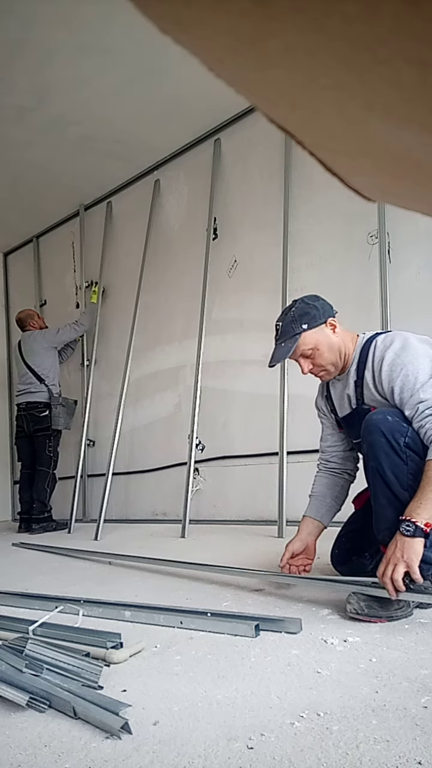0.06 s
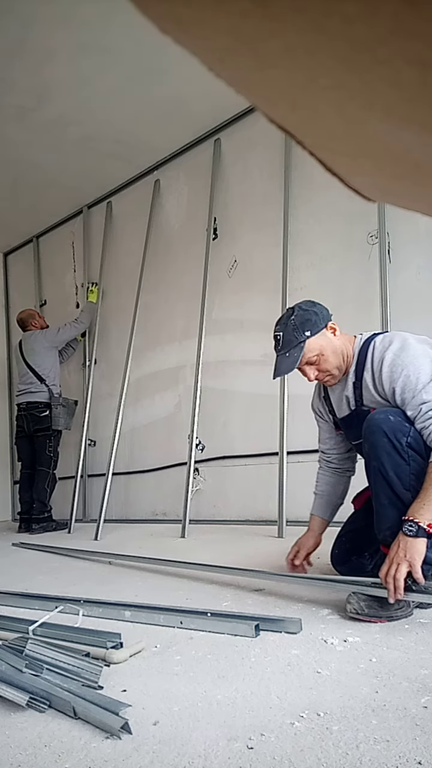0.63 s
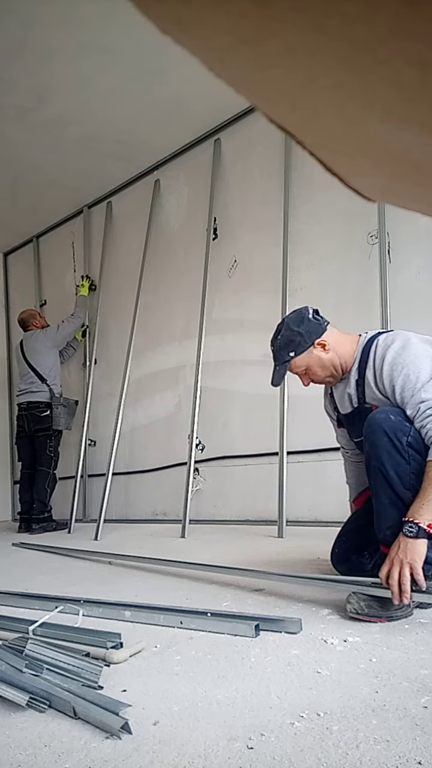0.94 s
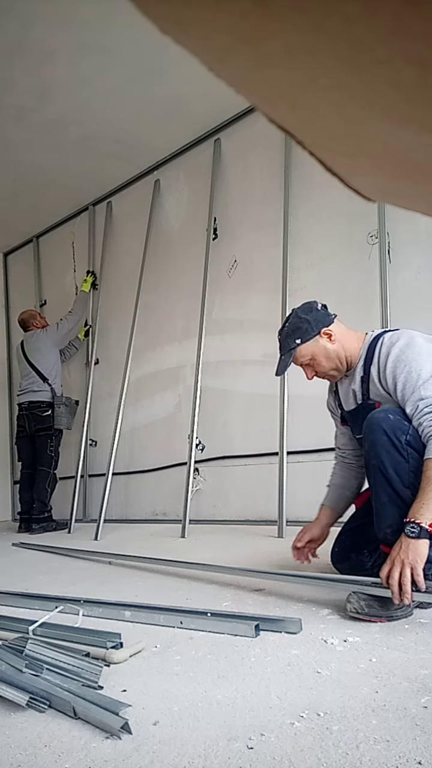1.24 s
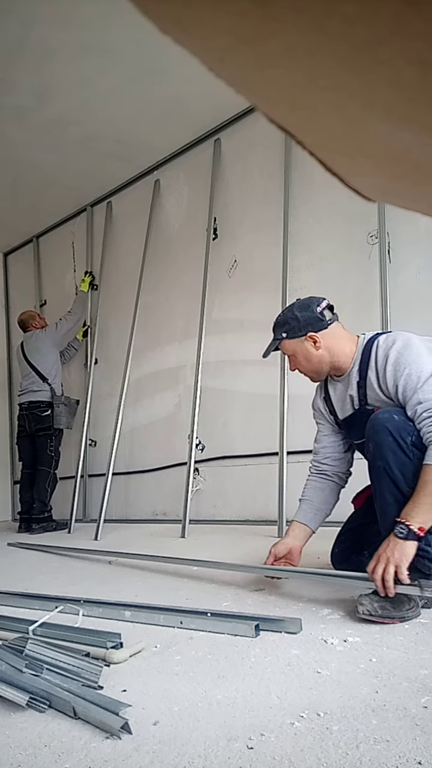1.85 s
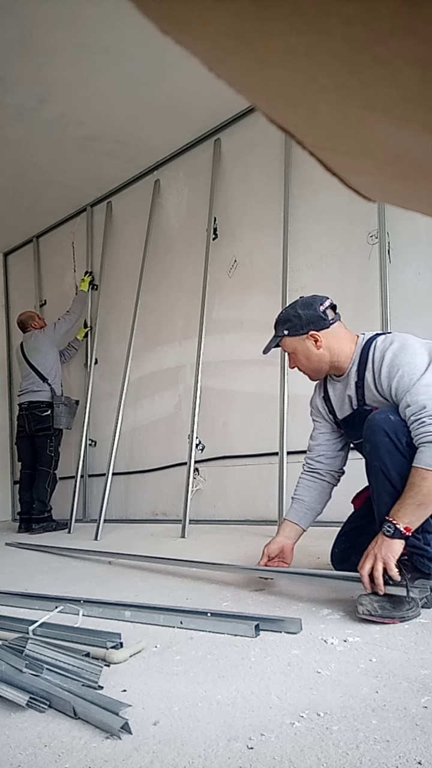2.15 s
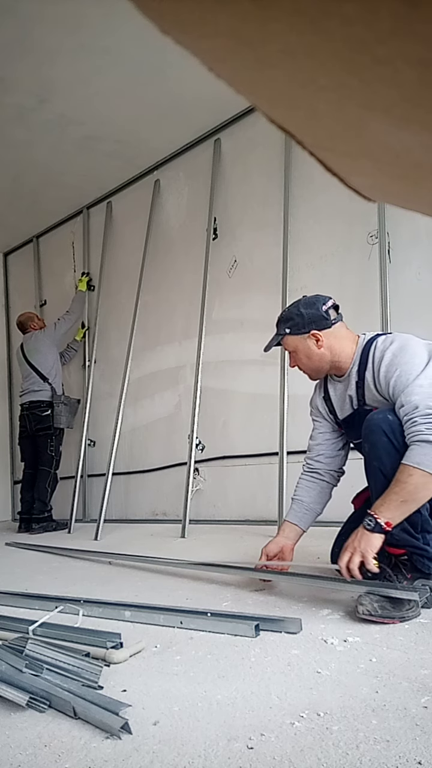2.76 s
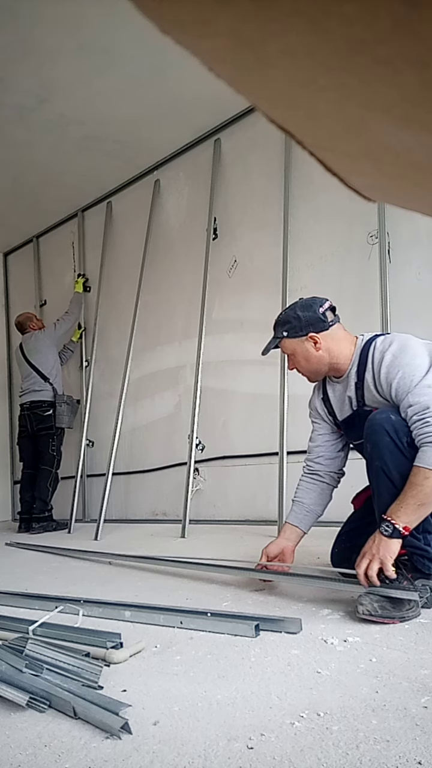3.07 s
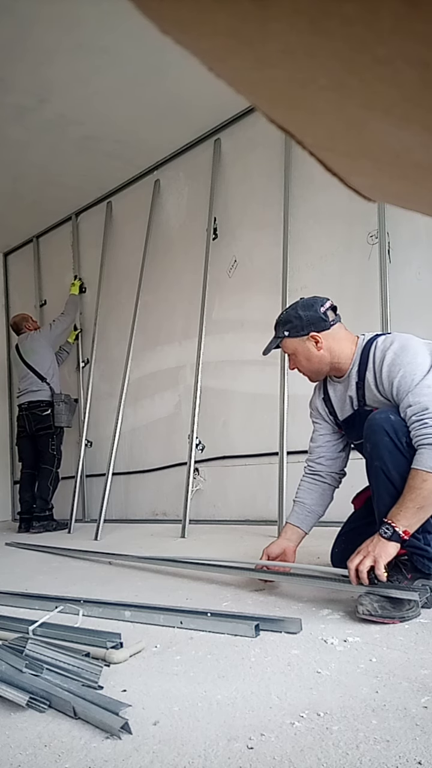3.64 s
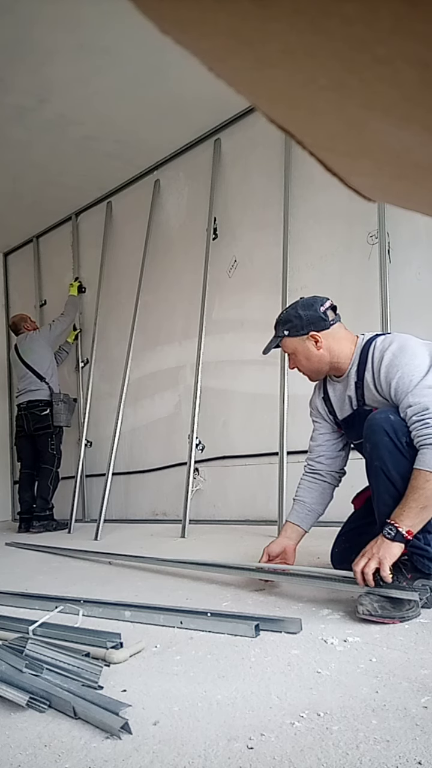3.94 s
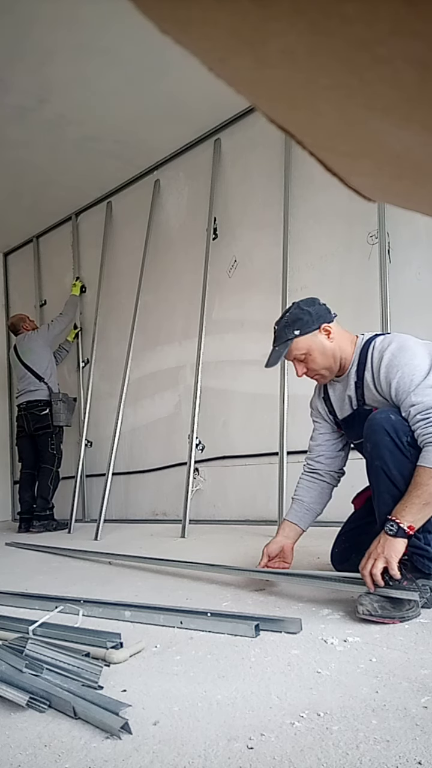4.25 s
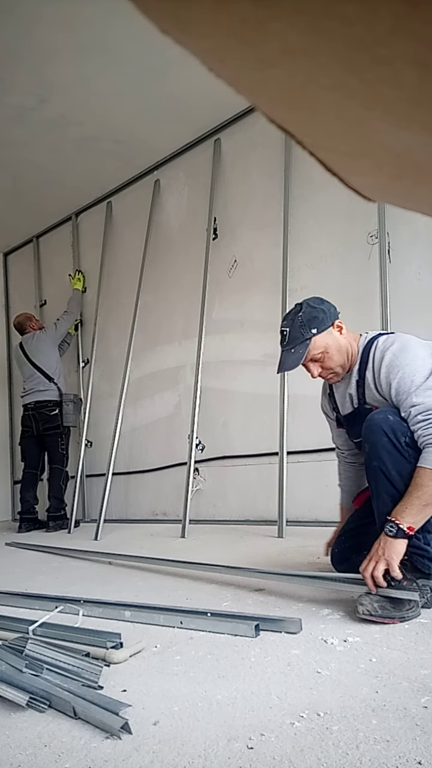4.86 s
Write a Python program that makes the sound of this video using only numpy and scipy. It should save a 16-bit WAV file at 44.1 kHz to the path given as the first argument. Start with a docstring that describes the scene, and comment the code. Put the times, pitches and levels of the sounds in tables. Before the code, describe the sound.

Metal clacks in an empty room, then a steel strip is pushed across concrete in hissing, ringing scrapes, ending with soft thuds.

```python
"""In a bare, echoing room a long thin steel wall profile is slid over a concrete floor.
The worker shuffles with a low rumble. Stick-slip friction makes the profile hiss and sing, its edge
snaps on grit, and its length flexes with a boom. Farther off, steel clacks on steel. At the end
the kneeling worker shifts his weight with a few dull thuds. One microphone hears it all."""
import sys
import numpy as np
from scipy import signal
from scipy.fft import rfft, irfft
from scipy.io import wavfile
from scipy.ndimage import uniform_filter1d

SR = 44100
rng = np.random.default_rng(int(sys.argv[2]) if len(sys.argv) > 2 else 0)


def transcribe(u):
    """Save the signal u as a 16-bit wav file named by the first command-line argument.

    u: samples, shape (n,) or (channels, n), limited to [-1, 1]; the rate is SR.
    q: integer samples, one column per channel.
    """
    v = np.clip(np.atleast_2d(u).T, -1, 1)
    q = np.round(v * 32767).astype(np.int16)
    wavfile.write(sys.argv[1], SR, q)


N = 220626
TIME = np.arange(N) / SR

# Pushes over the floor; pressure lifts the low middle of the scrape, sharpness its top treble:
# start_s, length_s, level_db, swell_db, pressure_db, sharpness_db
PUSHES = [(1.057, 0.093, -44, 0.5, -16.5, -11), (1.14, 0.069, -39.5, 4.5, -6, -15),
          (1.334, .11, -48, 2.5, 3.5, 0), (1.456, 0.077, -35.5, 0, -6, 9.5),
          (1.58, 0.053, -33, -6.5, -12.5, 7.5), (1.754, .3, -30, 3, -9.5, 6.5),
          (2.238, 0.11, -37.5, 10, -22, -6), (2.46, 0.19, -36.5, 12, -25, -4.5),
          (2.628, 0.26, -27, 5, -15.5, -4.5), (2.817, .24, -26.5, 3.5, -4.5, -6.5),
          (3.081, 0.24, -29.5, 1.5, -2.5, -8.5), (3.248, 0.18, -24.5, 2, -6.5, -5.5),
          (3.45, 0.049, -31, 0, 4.5, -13), (3.558, 0.2, -49, -2, 4, -22),
          (3.763, 0.038, -37, -2.5, -29.5, -11), (3.91, 0.11, -48.5, -1, -11, -14),
          (4.155, 0.06, -59.5, 9, -3, -10)]


def gain_of(db):
    """Decibels to amplitude ratio."""
    return 10 ** (np.asarray(db) / 20)


def unit_rms(x):
    """Scales to rms 1."""
    return x / np.sqrt(np.mean(x ** 2) + 1e-20)


def unit_energy(x):
    """Scales to energy 1."""
    return x / (np.linalg.norm(x) + 1e-12)


def curve_at(points, hz):
    """Interpolates (frequency_hz, value) points on a log-frequency axis."""
    knots_hz, values = np.transpose(points)
    return np.interp(np.log(hz + 1), np.log(knots_hz + 1), values)


def add(mix, start_s, sound):
    """Superposes a sound on the mix."""
    part = mix[max(round(start_s * SR), 0):][:len(sound)]
    part += sound[:len(part)]


def through(x, response):
    """Convolves and keeps the length."""
    return signal.fftconvolve(x, response)[:len(x)]


def colour(spectrum, tilt_db_per_octave=0, size=4096):
    """Minimum-phase response: the phase is the Hilbert transform of the log magnitude."""
    hz = abs(np.fft.fftfreq(size, 1 / SR))
    octaves = np.log2(np.maximum(hz, 500) / 5000)
    log_gain = np.log(gain_of(curve_at(spectrum, hz) + tilt_db_per_octave * octaves))
    transfer = np.exp(np.conj(signal.hilbert(log_gain)))
    return unit_energy(np.fft.ifft(transfer).real[:size // 2])


def envelope(t, start_s, length_s, attack_s, release_db_per_s):
    """Linear attack, hold and exponential decay."""
    attack = np.clip((t - start_s) / attack_s, 0, 1)
    return attack * gain_of(-release_db_per_s * np.maximum(t - start_s - length_s, 0))


def rumble(edge_share=0.23, push_offset_db=-13.5, building_murmur_db=-74.5):
    """Structure-borne sound: the worker shuffles on the floor and the pushed profile flexes."""
    # Spectrum of the rumble: frequency_hz, level_db
    spectrum = [(25, -38), (50, -29), (75, -12.5), (115, 5), (155, 4.5), (210, -8), (320, -18.5),
                (600, -23.5), (1500, -55.5), (6000, -101)]
    # Low rumbles, the worker shuffling and later the profile flexing: start_s, length_s, level_db
    rumbles = [(-.03, 0.33, -51), (0.607, 0.064, -50.5), (0.786, .16, -52.5), (1.216, 0.28, -48),
               (2.369, 0.055, -60), (2.674, .12, -52.5), (3.56, 0.084, -47)]
    # A push flexes the profile less when it rides on its edge.
    loads = [(start_s, length_s, db + pressure_db - edge_share * sharpness_db + push_offset_db)
             for start_s, length_s, db, _, pressure_db, sharpness_db in PUSHES]
    power = gain_of(building_murmur_db) ** 2
    for start_s, length_s, db in loads + rumbles:
        swell = envelope(TIME, start_s, length_s, attack_s=0.044, release_db_per_s=162)
        power += (gain_of(db) * swell) ** 2
    return np.sqrt(power) * unit_rms(through(rng.standard_normal(N), colour(spectrum)))


def air(level_db=-65.5):
    """Ambient noise: the quiet room has a steady, mostly low spectrum."""
    # Spectrum of the background: frequency_hz, level_db
    spectrum = [(25, -34), (45, -17), (70, 0), (130, -7), (250, -18.5), (500, -13), (1000, -29),
                (2500, -17), (4500, -29), (7000, -19), (11000, -42), (15500, -35)]
    return gain_of(level_db) * unit_rms(through(rng.standard_normal(N), colour(spectrum)))


def steel(ring_db):
    """Modal response: the contact impulse, then the damped modes that it excites."""
    # Modes of the steel profile: pitch_hz, level_db, t60_s
    modes = [(540, -2, 1), (645, 0, 0.081), (793, -5, 0.76), (993, -0.5, 0.26), (1238, -2, 0.75),
             (1430, -28, .25), (1519, 5, 0.12), (1564, 2.5, 0.13), (1565, -24, 0.12), (1892, 2, 0.435),
             (2290, 1.5, 0.34), (2635, 5.5, 0.48), (2710, 1.5, 0.19), (2850, -28, 0.36), (3300, 4, 0.31),
             (3240, -5.5, 1), (3700, -0.5, .2), (3990, -11, .2), (4800, 2, 0.18), (6000, -12.5, 0.13),
             (6200, 2, 0.14), (6080, -16, 0.126), (6260, 2, 0.07), (6710, 6, 0.061), (7640, -23, 0.1)]
    t = np.arange(SR // 2) / SR
    ring = sum(gain_of(db - 60 * t / t60_s) / np.sqrt(t60_s) * np.cos(2 * np.pi * hz * t)
               for hz, db, t60_s in modes)
    response = gain_of(ring_db) * unit_energy(ring)
    response[0] += 1
    return unit_energy(response)


def slips(per_s, spread_db, size):
    """Poisson process: tiny catches and releases come as independent impulses."""
    occurs = rng.random(size) < per_s / SR
    height_db = spread_db * np.minimum(rng.exponential(1, size), 4)
    sign = rng.choice([-1., 1.], size)
    return unit_rms(sign * occurs * gain_of(height_db))


def clacks(steel_response):
    """Contact chatter: loose thin steel rebounds many times at each touch, exciting its modes."""
    # Spectrum of a clack: frequency_hz, level_db
    spectrum = [(150, -33), (450, -30), (1000, -26.5), (1450, -7), (2100, -5.5), (3000, -4), (4300, -3.5),
                (6000, 2), (7200, 2), (8500, -3.5), (10500, -6.5), (13200, -22.5), (15200, -8)]
    # Steel touching steel: start_s, level_db, length_s, tilt_db_per_octave
    touches = [(.001, -38.5, 0.012, -8.5), (.032, -18.5, 0.03, 0), (0.26, -24, 0.009, -0.5),
               (.302, -24, .023, -2.5), (0.664, -56.5, 0.13, -4), (.775, -32.5, 0.031, -3),
               (1.201, -32, 0.006, 7), (1.301, -29.5, 0.02, -4), (2.627, -20.5, 0.02, 3),
               (2.699, -17.5, 0.0088, 1), (2.922, -10, 0.0027, 1.5), (3.002, -18, 0.0068, 0.5),
               (3.216, -17.5, 0.006, -2.5), (3.795, -33, 0.0064, 3), (3.932, -40.5, 0.019, -7),
               (4.137, -44, 0.035, -6), (4.156, -37, 0.0063, -5.5), (4.739, -44, 0.02, -2),
               (4.846, -41.5, .056, -2.5)]
    out, t = np.zeros(N), np.arange(SR // 2) / SR
    for start_s, db, length_s, tilt in touches:
        swell = np.minimum(0.61 + 6 * t / length_s, 1) * np.exp(-(t / length_s) ** 4)
        rattle = slips(per_s=4000, spread_db=0, size=len(t)) * swell
        clack = through(through(rattle, steel_response), colour(spectrum, tilt))
        add(out, start_s, gain_of(db) * np.sqrt(length_s * SR) * unit_energy(clack))
    return out


def squeals_and_rubs(steadiness=0.64, fade_share=0.43):
    """Bandwidth sets tonality: short squeals and creaks, a broad steel ring and a faint high rub."""
    # Narrow bands sing, wide ones rustle: start_s, length_s, centre_hz, bandwidth_hz, level_db
    bands = [(.03, .1, 1553, 200, -40.5), (.071, 0.11, 770, 150, -55.5), (0.083, 0.1, 450, 150, -53),
             (0.502, 0.26, 419, 5.8, -52), (0.799, 0.04, 680, 200, -53.5), (.91, 0.16, 2520, 1100, -54),
             (1.172, 0.085, 2750, 170, -44), (1.027, 0.12, 538, 220, -61.5), (1.467, 0.13, 1560, 73, -47),
             (1.793, 0.057, 257, 38, -47), (1.79, .11, 1565, 85, -38), (1.86, 0.18, 537, 82, -43.5),
             (1.87, 0.25, 1597, 68, -32.5), (2.741, 0.43, 2746, 76, -34.5), (3.22, 0.29, 2726, 67, -32),
             (3.987, 0.1, 690, 66, -57.5), (4.101, 0.092, 3270, 280, -53), (4.134, 0.081, 2410, 490, -50),
             (4.167, 0.086, 450, 45, -58.5), (4.429, 0.11, 6950, 970, -58.5), (4.532, .1, 2026, 84, -57.5),
             (4.546, 0.095, 3194, 160, -60.5), (4.688, 0.16, 3215, 120, -53), (4.73, 0.063, 675, 140, -54)]
    out, hz = np.zeros(N), np.fft.rfftfreq(SR, 1 / SR)
    for start_s, length_s, centre_hz, bandwidth_hz, db in bands:
        peak = 1 / (1 + (2 * (hz - centre_hz) / bandwidth_hz) ** 2)
        band_noise = irfft(rfft(rng.standard_normal(SR)) * peak)
        swing = signal.hilbert(band_noise)[:int(length_s * SR)]
        steadied = unit_rms(swing.real / abs(swing) ** steadiness)
        add(out, start_s, gain_of(db) * steadied * signal.windows.tukey(len(steadied), fade_share))
    return out


def push_gain(t, hz, press_build_db=4.5, edge_dull_db=3, attack_s=0.031):
    """Contact loading shapes the scrape: in each push the weight comes down and the edge flattens."""
    # Decay as the profile stops: frequency_hz, decay_db_per_s
    decay_rates = [(600, 119), (3000, 115), (11000, 256)]
    release = curve_at(decay_rates, hz)[:, None]
    body_share = curve_at([(700, 0.89), (1600, 0.44), (3000, 0.17), (5500, 0)], hz)[:, None]
    top_share = curve_at([(1600, 0.083), (3000, -0.11), (7000, 0.22), (10500, 0.72)], hz)[:, None]
    power = 0
    for start_s, length_s, db, swell_db, pressure_db, sharpness_db in PUSHES:
        progress = np.clip((t - start_s) / length_s, 0, 1) - 0.5  # zero at mid-push
        body_db = body_share * (pressure_db + press_build_db * progress + 9)
        top_db = top_share * (sharpness_db - edge_dull_db * progress + 15)
        gain = gain_of(db + swell_db * progress + body_db + top_db)
        power += (gain * envelope(t, start_s, length_s, attack_s, release)) ** 2
    return np.sqrt(power)


def scrape(steel_response, level_db=0.79, patchy_db=1.0, judder_db=1.5):
    """Stick-slip friction: thousands of slips a second drive the steel into a ringing hiss."""
    # Spectrum of sliding steel: frequency_hz, level_db
    spectrum = [(150, -22), (330, -11), (540, -4.5), (900, -5.5), (1150, -4.5), (1600, 3), (2100, 0),
                (2900, 4), (3800, 0.5), (5300, 1), (6700, 2), (8200, -6), (13200, -22.5), (15200, -16)]
    drive = slips(per_s=6000, spread_db=3, size=N)
    hiss = unit_rms(through(through(drive, steel_response), colour(spectrum)))
    hz, t, bands = signal.stft(hiss, SR, nperseg=512, noverlap=384)
    # The contact point wanders along the profile and favours changing groups of modes.
    mode_groups = uniform_filter1d(rng.standard_normal(bands.shape), 9, axis=0)
    patches = unit_rms(uniform_filter1d(mode_groups, 8, axis=1))
    judder = unit_rms(uniform_filter1d(rng.standard_normal(len(t)), 4))
    bands *= push_gain(t, hz) * gain_of(level_db + patchy_db * patches + judder_db * judder)
    return signal.istft(bands, SR, nperseg=512, noverlap=384)[1][:N]


def snaps(sweep_s=0.006, half_width_s=0.001):
    """Dispersion: bending waves carry the treble first, so each snap is a tiny falling chirp."""
    # Grit snapping under the near edge: time_s, level_db, centre_hz
    grains = [(1.426, -38, 9900), (1.474, -22, 9280), (1.4903, -21, 9700), (1.592, -19.5, 9200),
              (1.601, -21, 9250), (1.782, -23, 7440), (1.786, -41, 9700), (1.805, -38, 7440),
              (3.78, -46, 12900), (3.792, -39, 10600), (3.911, -31.5, 6300), (4.16, -36, 5700)]
    out, t = np.zeros(N), np.arange(-130, 130) / SR
    for time_s, db, hz in grains:
        chirp = np.cos(2 * np.pi * hz * (t - t ** 2 / sweep_s)) * np.exp(-(t / half_width_s) ** 2)
        add(out, time_s + t[0], gain_of(db) * chirp)
    return out


def thuds():
    """Soft impact: a heavy, yielding contact puts its energy into low frequencies."""
    # Spectrum of a thud: frequency_hz, level_db
    spectrum = [(25, -35), (48, -20), (66, -4), (90, -3.5), (120, -6), (190, -14.5), (330, -23.5),
                (800, -23.5), (1200, -36), (3000, -28), (10000, -55)]
    # Knee and shoe on the floor: start_s, level_db, decay_s
    impacts = [(4.75, -46, 0.13), (4.824, -34.5, 0.092), (4.895, -30.5, 0.024), (4.965, -41, 0.04)]
    out, t = np.zeros(N), np.arange(SR // 4) / SR
    for start_s, db, decay_s in impacts:
        force = rng.standard_normal(len(t)) * np.exp(-t / decay_s)
        thud = unit_energy(through(force, colour(spectrum)))
        add(out, start_s, gain_of(db) * np.sqrt(decay_s * SR) * thud)
    return out


def reflections(build_up_s=0.0069):
    """Reverberation from one source position: wall echoes and a tail whose treble dies first."""
    # Reverberation times of the room: frequency_hz, t60_s
    decay_times = [(100, 1), (500, 0.59), (1500, 1), (3700, 0.73), (7000, 0.43), (10000, 0.37),
                   (15000, 0.23)]
    # Early reflections: delay_s, gain
    echoes = [(.0034, 0.22), (.0086, 0.3), (0.0115, 0.13), (0.0154, 0.084), (0.024, 0.12)]
    hz, t, bands = signal.stft(rng.standard_normal(SR), SR, nperseg=256)
    t60_s = curve_at(decay_times, hz)[:, None]
    decaying = bands * gain_of(-60 * t / t60_s) / np.sqrt(t60_s)
    tail = signal.istft(decaying, SR, nperseg=256)[1][:SR]
    response = unit_energy(tail * np.minimum(TIME[:SR] / build_up_s, 1))
    for delay_s, gain in echoes:
        response[round(delay_s * SR * rng.uniform(0.96, 1.04))] += gain
    return unit_energy(response)


def room(x, drift_hz=13, spots=6):
    """Extended source: the profile radiates from many spots, whose reflections keep trading places."""
    rates_hz = np.linspace(drift_hz / spots, drift_hz, spots)
    shares = [np.cos(2 * np.pi * (hz * TIME + rng.random())) for hz in rates_hz]
    shares = shares / np.linalg.norm(shares, axis=0)  # constant total power
    return sum(through(x * share, reflections()) for share in shares)


def scene():
    """Superposition of direct sound, reverberation, rumble and air, alike in both channels."""
    # sound, direct_db, reverberant_db
    sources = [(scrape(steel(ring_db=-15)), -4, -2.5),
               (clacks(steel(ring_db=-15.5)), -7.5, -2),
               (snaps(), 0.5, -11),
               (squeals_and_rubs(), -3, -2),
               (thuds(), -6.5, -3)]
    direct = sum(gain_of(db) * sound for sound, db, _ in sources)
    reverberant = room(sum(gain_of(db) * sound for sound, _, db in sources))
    return np.tile(direct + reverberant + air() + rumble(), (2, 1))


def record(dry):
    """Band limiting: a linear-phase low-pass removes the highest treble."""
    cutoff_hz = 16050
    low_pass = signal.firwin(511, cutoff_hz, window=("kaiser", 9), fs=SR)
    return signal.oaconvolve(dry, low_pass[None], "same")


dry = scene()
out = record(dry)
transcribe(out)
```